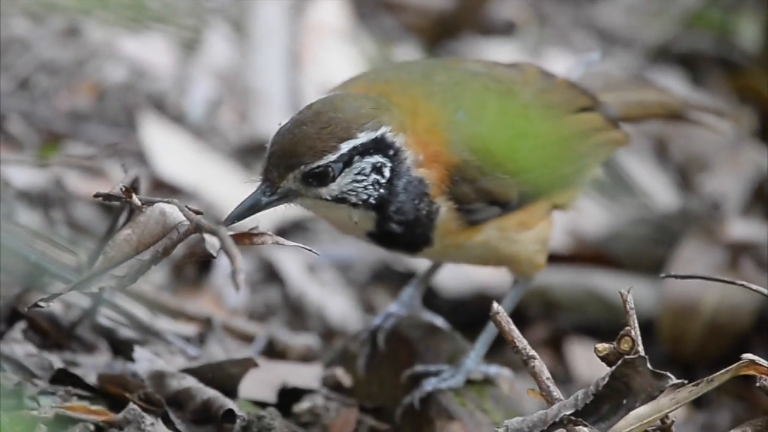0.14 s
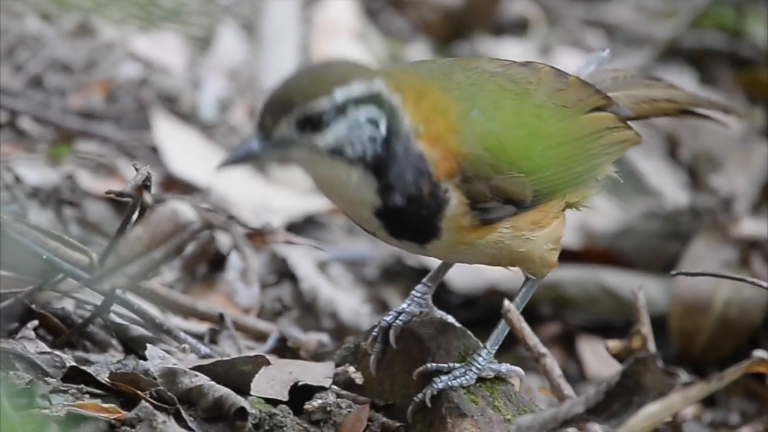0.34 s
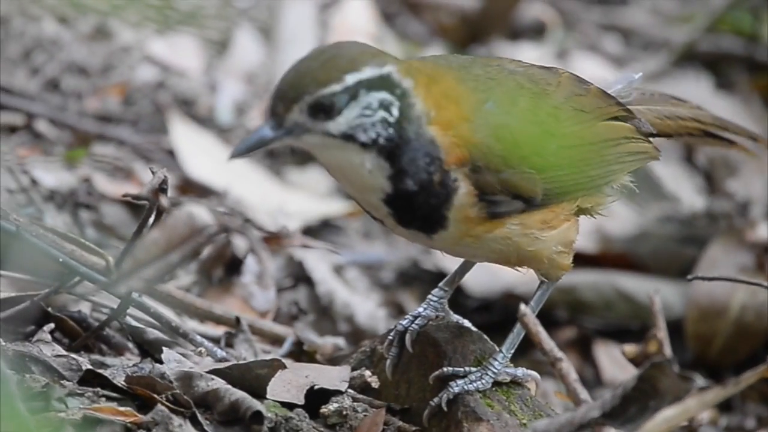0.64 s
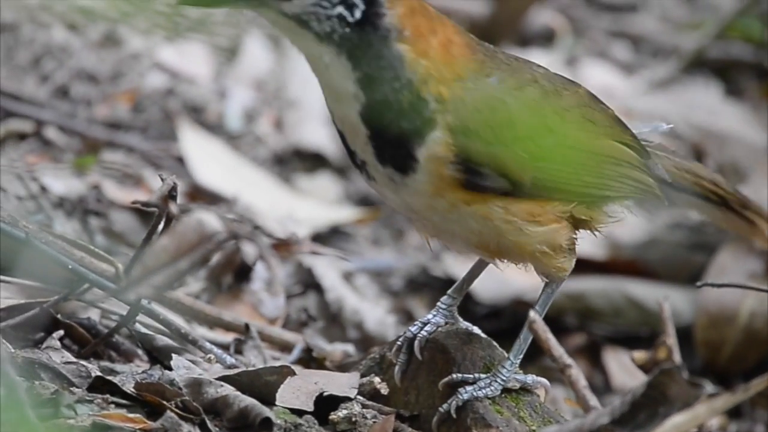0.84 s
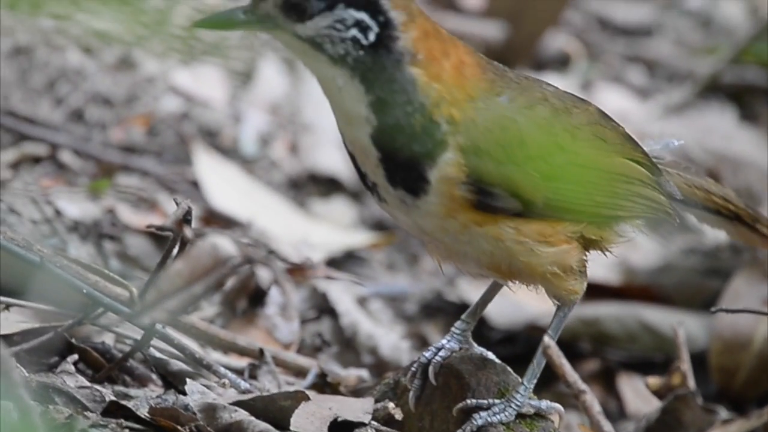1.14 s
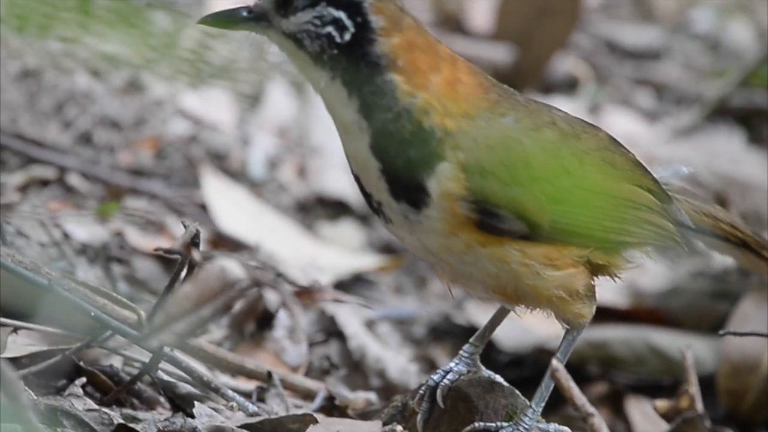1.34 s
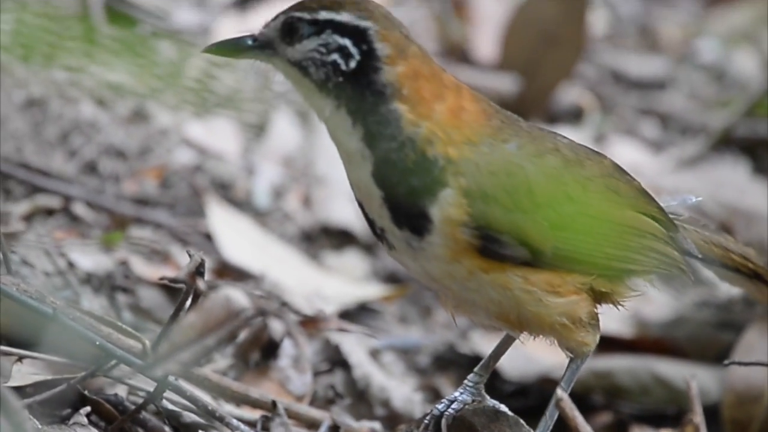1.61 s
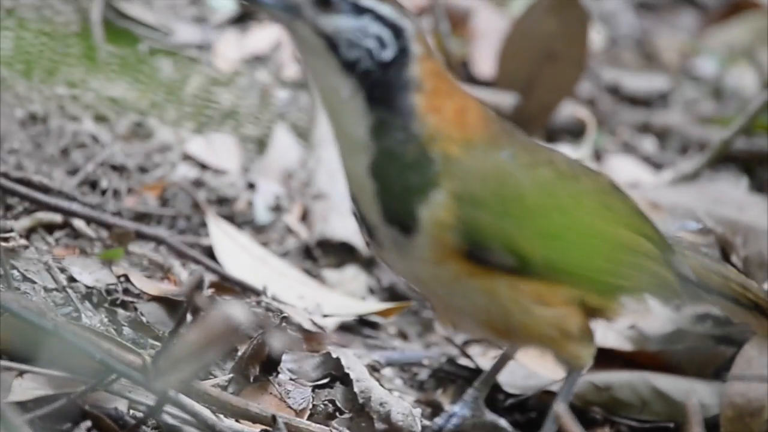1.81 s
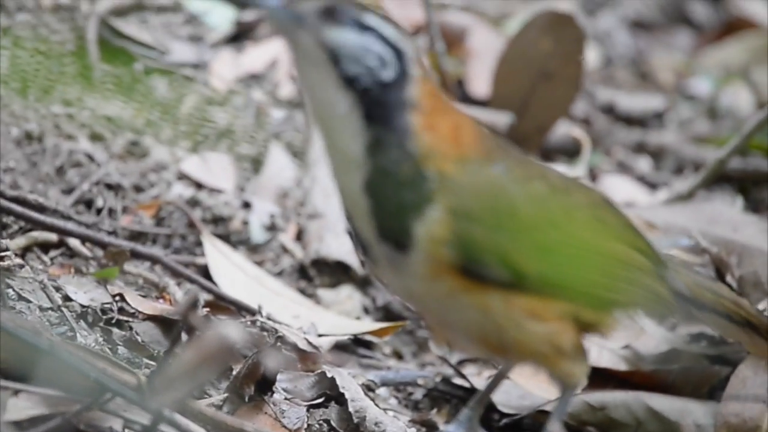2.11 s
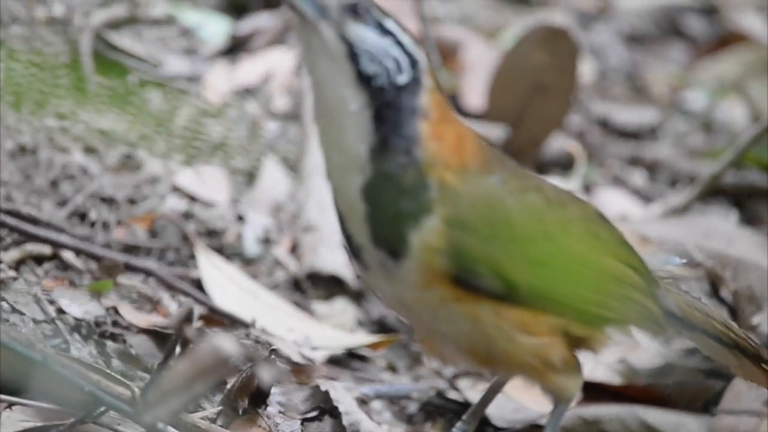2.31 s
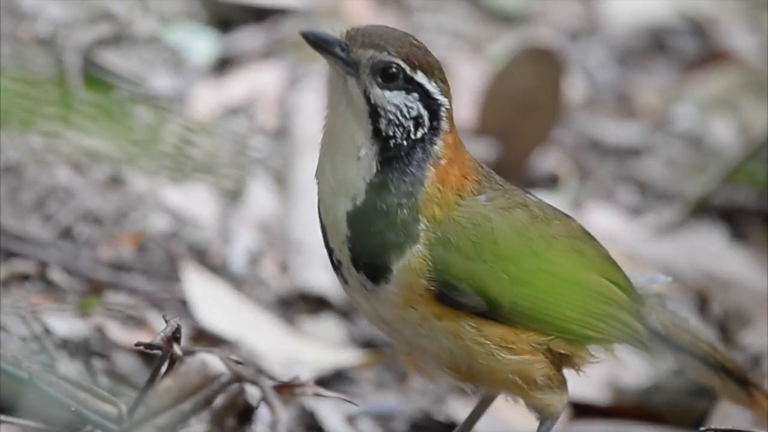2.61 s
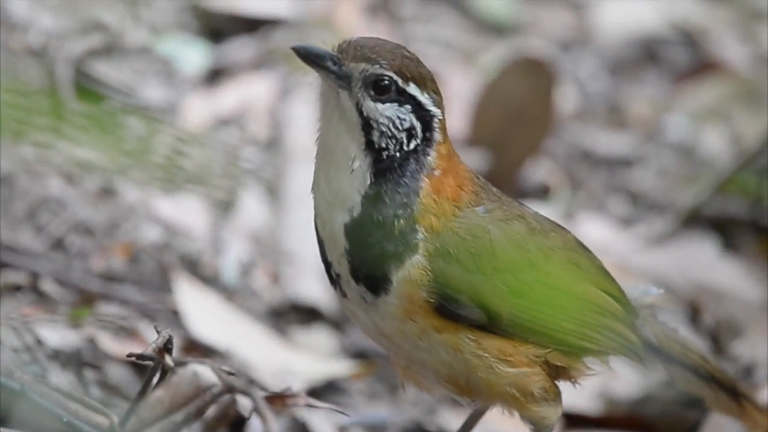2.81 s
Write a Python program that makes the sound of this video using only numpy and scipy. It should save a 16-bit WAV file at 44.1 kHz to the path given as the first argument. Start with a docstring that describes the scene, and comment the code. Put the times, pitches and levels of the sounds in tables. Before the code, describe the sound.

In a forest, a close bird gives clear, slightly hoarse whistles that bunch into a warble, then a far bird replies weakly. Low wind buffets the microphone throughout, with steady hiss and a faintly pulsing insect behind.

```python
"""Wind flutters and thumps on a nearly mono microphone, over its hiss and a faintly pulsing insect.
A bird whistles falling and level notes among trees; trunks and leaves scatter each slightly
hoarse tone into a warbling tail. A far bird answers, mostly as echo."""
import sys
import numpy as np
from scipy import signal
from scipy.fft import rfft, irfft
from scipy.io import wavfile
from scipy.ndimage import uniform_filter1d

SR = 44100
rng = np.random.default_rng(int(sys.argv[2]) if len(sys.argv) > 2 else 0)


def to_wav(s):
    """Save 16-bit WAV."""
    ch = np.atleast_2d(s).T  # columns
    pcm = np.round(np.clip(ch, -1, 1) * 32767)  # PCM
    wavfile.write(sys.argv[1], SR, pcm.astype(np.int16))


N = 130095
TIME_S = np.arange(N) / SR
SIDE_SIGN = np.array([[1], [-1]])  # left, right


def undb(db):
    return 10 ** (np.asarray(db) / 20)


def at_rms(x, db):
    return x * undb(db) / np.sqrt(np.mean(x ** 2))


def gain_at(rows, hz):
    """Gain from (Hz, dB) rows, on a log frequency axis."""
    row_hz, row_db = np.array(rows).T
    return undb(np.interp(np.log(np.maximum(hz, 1)), np.log(row_hz), row_db))


def envelope(rows):
    """Gain over time from (s, dB) rows."""
    return undb(np.interp(TIME_S, *np.array(rows).T))


def band_gain(hz, centre_hz, width_oct):
    octaves = np.log2(np.maximum(hz, 1) / centre_hz)
    return np.cos(np.pi * np.clip(octaves / width_oct, -.5, .5))


def tinted(gain, x=None):
    """White noise, or x, filtered by gain(Hz)."""
    x = rng.standard_normal(N) if x is None else x
    hz = np.fft.rfftfreq(N + 1, 1 / SR)
    return irfft(rfft(x, N + 1) * gain(hz), N + 1)[:N]


def wander(per_s):
    """Smoothed random steps, spread near 1."""
    hold = int(SR / per_s)
    steps = np.repeat(rng.standard_normal(N // hold + 1), hold)
    return 1.34 * uniform_filter1d(uniform_filter1d(steps, hold), hold)[:N]


# wind spectrum: freq_hz, relative_db
WIND_SPECTRUM = [(15, -73), (25, -43.5), (64, -9), (77, -18.5), (108, -1.5), (158, -9), (236, -8),
                 (397, -4.5), (485, -6.5), (536, -10.5), (884, -12.5), (977, -15), (3000, -38.5),
                 (3900, -76), (6600, -120)]
# wind level in the bass: time_s, level_db
WIND_BASS = [(0.0, -56.5), (0.66, -45), (0.94, -51.5), (1.04, -50), (1.27, -58), (1.38, -39), (1.54, -46.5),
             (1.68, -49), (2.02, -52.5), (2.15, -47.5), (2.6, -60), (2.95, -48)]
# wind level above the bass: time_s, level_db
WIND_UPPER = [(0.0, -41), (0.02, -39), (0.29, -36.5), (0.32, -30), (0.35, -39), (1.03, -33), (1.15, -39),
              (1.23, -32.5), (1.25, -34), (1.51, -32), (1.55, -35), (1.77, -31.5), (1.86, -38.5),
              (1.9, -33), (2.27, -35.5), (2.29, -31.5), (2.84, -37), (2.95, -38)]


def wind(flicker_db=3.5, flicker_per_s=30, eddies_per_s=90, eddy_db=-10, crossover_hz=165):
    """Wind on the microphone: bands flicker independently and small eddies pop through them."""
    flutter = 0
    for hz in 28 * 2 ** np.arange(0, 7, .5):
        band = tinted(lambda f: gain_at(WIND_SPECTRUM, f) * band_gain(f, hz, width_oct=1))
        depth_db = flicker_db * min(1, 600 / hz)
        flutter += band * undb(depth_db * wander(flicker_per_s))
    hits = rng.random(N) < eddies_per_s / SR
    strength = undb(3.5 * np.minimum(rng.exponential(size=N), 3))
    kicks = hits * strength * rng.choice([-1, 1], N)
    eddies = tinted(lambda f: gain_at(WIND_SPECTRUM, f) / (1 + (f / 600) ** 4), kicks)
    air = at_rms(flutter, 0) + at_rms(eddies, eddy_db)
    bass = tinted(lambda f: 1 / (1 + (f / crossover_hz) ** 6), air)
    return at_rms(bass, 0) * envelope(WIND_BASS) + at_rms(air - bass, 0) * envelope(WIND_UPPER)


# hiss spectrum: freq_hz, relative_db
HISS_SPECTRUM = [(1500, 9), (3000, -1), (5000, -4.5), (7000, -1.5), (10000, -3), (15800, -8)]
# hiss stereo width: freq_hz, side_over_mid_db
HISS_WIDTH = [(1500, -40), (2500, -29.5), (3500, -13.5), (4500, -8), (8000, -6), (15000, -4.5)]


def hiss(level_db=-55.5, shared_waver_db=.5, band_waver_db=1.2, waver_per_s=30):
    """Microphone self-noise, wavering band by band, wide only in the treble."""
    out = 0
    shared_db = shared_waver_db * wander(waver_per_s)
    for hz in 1400 * 2 ** np.arange(0, 3.75, .25):
        gain = lambda f: gain_at(HISS_SPECTRUM, f) * band_gain(f, hz, width_oct=.5)
        mid = tinted(gain)
        side = tinted(lambda f: gain(f) * gain_at(HISS_WIDTH, f))
        out += (mid + side * SIDE_SIGN) * undb(shared_db + band_waver_db * wander(waver_per_s))
    return at_rms(out, level_db)


# insect rasp bands: centre_hz, width_hz, level_db
INSECT_BANDS = [(3990, 700, -65.5), (4636, 400, -67)]
# insect swell: time_s, relative_db
INSECT_ENVELOPE = [(0, -2.5), (.6, -2.5), (1, -0.5), (1.9, 1.5), (2.4, 0), (2.95, -2.5)]


def insect(pulses_per_s=13, first_s=.03, duty=.31, steady_gain=.8, waver_db=1.2):
    """Narrow rasps, pulsing evenly over a sustained floor."""
    cycle = ((TIME_S - first_s) * pulses_per_s + .5) % 1 - .5
    pulse = steady_gain + np.exp(-(2 * cycle / duty) ** 2)
    pulse *= undb(waver_db * wander(per_s=8.85)) * envelope(INSECT_ENVELOPE)
    out = 0
    for centre_hz, width_hz, level_db in INSECT_BANDS:
        rasp = tinted(lambda f: 1 / (1 + (2 * (f - centre_hz) / width_hz) ** 2))
        out += at_rms(pulse * rasp, level_db)
    return out


def bend(progress, start, mid, end):
    """Parabola through start, mid, end at progress 0, 1/2, 1."""
    left = 1 - progress
    return (start * left - end * progress) * (left - progress) + 4 * mid * progress * left


def whistle(notes, full_voice_db, breath_hz=268, breath_db=-4, roughen_s=.016,
            attack_s=.003, release_s=.0073):
    """Gliding tones with breath noise around them; each starts clean and is hoarser when weak."""
    out = np.zeros(N)
    breath = [at_rms(tinted(lambda f: np.exp(-(f / breath_hz) ** 3)), -3) for _ in range(2)]
    for start_s, length_s, *contour in notes:
        span = slice(int(start_s * SR), int((start_s + length_s) * SR) + 1)
        age_s = np.clip(TIME_S[span] - start_s, 0, length_s)
        pitch_hz = bend(age_s / length_s, *contour[:3])
        level_db = bend(age_s / length_s, *contour[3:])
        phase = 2 * np.pi * np.cumsum(pitch_hz) / SR
        air = breath[0][span] * np.sin(phase) + breath[1][span] * np.cos(phase)
        hoarse = undb(breath_db + .5 * (full_voice_db - level_db)) * np.minimum(age_s / roughen_s, 1)
        voice = (np.sin(phase) + hoarse * air) / np.sqrt(1 + hoarse ** 2)
        ramp = np.clip(np.minimum(age_s / attack_s, (length_s - age_s) / release_s), 0, 1)
        out[span] += voice * undb(level_db) * np.sin(np.pi / 2 * ramp) ** 2
    return out


def tree_echo(song, leaves_t60_s, trunks_t60_s=.65, trunks_db=-11, rise_s=.002):
    """A dense cluster off nearby leaves and ground, and a long thin tail off farther trunks."""
    t = np.arange(SR) / SR

    def decay(t60_s):
        shape = undb(-60 * t / t60_s) * np.minimum(t / rise_s, 1)
        return shape / np.linalg.norm(shape)

    tail = np.hypot(decay(leaves_t60_s), undb(trunks_db) * decay(trunks_t60_s))
    return signal.fftconvolve(song, rng.standard_normal(SR) * tail)[:N]


# near bird's notes: start_s, length_s, start_hz, mid_hz, end_hz, start_db, mid_db, end_db
NEAR_SONG = [ (.211, 0.032, 2744, 2087, 1870, -38.5, -20, -38),
             (.250, 0.055, 1950, 2600, 2350, -50, -62, -59),
             (.476, 0.057, 2714, 2285, 2170, -19.5, -17, -26),
             (.546, 0.059, 2136, 2290, 2625, -27, -30, -44),
             (.808, 0.036, 2720, 2050, 1920, -18.5, -19, -22),
             (.848, 0.065, 2050, 2480, 2480, -21.5, -42.5, -38),
             (.880, 0.031, 3090, 3000, 2750, -35, -29, -29), (.911, 0.036, 2954, 3000, 2880, -18, -23, -12),
             (.945, 0.052, 2866, 2700, 2648, -24.5, -19.5, -21.5),
             (.960, .150, 3033, 3000, 2967, -20.5, -41.5, -41),
             (1.010, 0.093, 2657, 2870, 2654, -27, -32.5, -33.5),
             (1.125, 0.07, 2687, 2870, 2933, -41, -45.5, -39),
             (1.190, 0.023, 2310, 2000, 1730, -15.5, -16, -21),
             (1.236, 0.033, 2930, 2720, 2610, -28, -26.5, -32),
             (1.247, 0.013, 2300, 1890, 1860, -29, -17.5, -25),
             (1.281, 0.031, 2410, 2110, 1780, -15.5, -17.5, -25.5),
             (1.318, 0.038, 1896, 2260, 2330, -34, -29.5, -30),
             (1.414, 0.0347, 3070, 2940, 2930, -20.5, -32.5, -33),
             (1.447, 0.067, 2992, 2990, 2908, -18, -20, -19.5),
             (1.500, 0.031, 2853, 2720, 2550, -27, -18, -26),
             (1.536, 0.12, 2950, 2890, 3075, -28.5, -31.5, -31),
             (1.578, 0.041, 2410, 2500, 2300, -38, -39.5, -48),
             (1.620, 0.056, 2990, 3090, 2890, -23, -31.5, -38),
             (1.655, 0.059, 2942, 2740, 2690, -20, -35.5, -37),
             (1.675, 0.066, 3177, 3260, 3160, -37, -46, -44),
             (2.188, 0.04, 3077, 2985, 2920, -30.5, -23.5, -33),
             (2.222, 0.031, 2925, 2800, 2560, -37, -32, -43),
             (2.260, 0.082, 2590, 2920, 3240, -43, -48, -54)]


def near_bird(side_db=-45):
    """A close whistler; a trace of its echo differs left and right."""
    song = whistle(NEAR_SONG, full_voice_db=-18)
    mid, side = (tree_echo(song, leaves_t60_s=.07) for _ in range(2))
    return song + mid + undb(side_db) * side * SIDE_SIGN


# eddy hits on the capsule: centre_s, main_ring_db, width_s, upper_over_main_db
EDDY_HITS = [(.425, -39.5, 0.034, -5.5), (0.784, -42.5, 0.023, 10), (0.81, -39, 0.011, 6),
             (0.921, -30, 0.039, -4.5), (1.225, -34.5, 0.041, -1.5), (1.458, -34, .035, -10),
             (1.635, -37, 0.037, -12), (1.929, -30.5, 0.028, -19), (2.503, -38, 0.032, 2)]


def wind_thumps(main_hz=125, upper_hz=320, deep_hz=70, deep_over_main_db=-10.5):
    """The capsule rings briefly at three low pitches when an eddy hits."""
    out = np.zeros(N)
    for centre_s, main_ring_db, width_s, upper_over_main_db in EDDY_HITS:
        t = TIME_S - centre_s
        swell = undb(main_ring_db) * np.exp(-(2 * t / width_s) ** 2)
        for hz, db in (main_hz, 0), (upper_hz, upper_over_main_db), (deep_hz, deep_over_main_db):
            out += swell * undb(db) * np.sin(2 * np.pi * (hz * t + rng.random()))
    return out


# far bird's notes: start_s, length_s, start_hz, mid_hz, end_hz, start_db, mid_db, end_db
FAR_SONG = [ (1.919, 0.0355, 2140, 1946, 1740, -50, -45.5, -53),
            (2.007, 0.046, 2430, 2056, 1750, -47, -41, -50),
            (2.680, 0.095, 2960, 3664, 3060, -54, -52, -51)]


def far_bird(direct_db=-6):
    """A distant whistler, weaker direct than scattered by the trees."""
    song = whistle(FAR_SONG, full_voice_db=-42)
    return undb(direct_db) * song + tree_echo(song, leaves_t60_s=.2)


def scene():
    return wind() + hiss() + insect() + near_bird() + wind_thumps() + far_bird()


def record(dry, cutoff_hz=15850):
    """The recorder's steep low-pass."""
    return signal.sosfilt(signal.ellip(18, .3, 90, cutoff_hz, fs=SR, output="sos"), dry)


dry = scene()
out = record(dry)
to_wav(out)
```